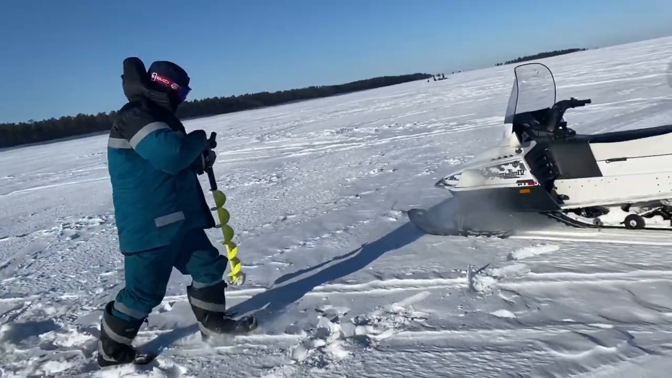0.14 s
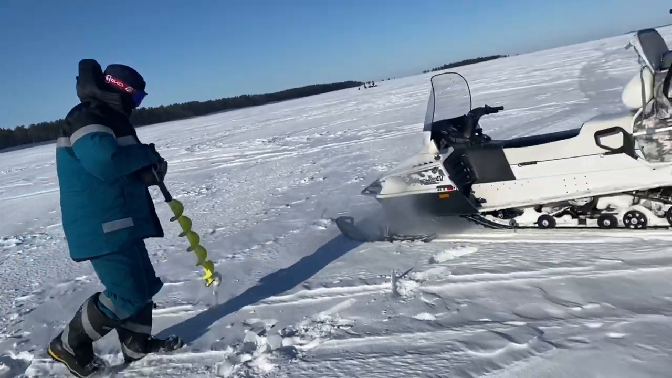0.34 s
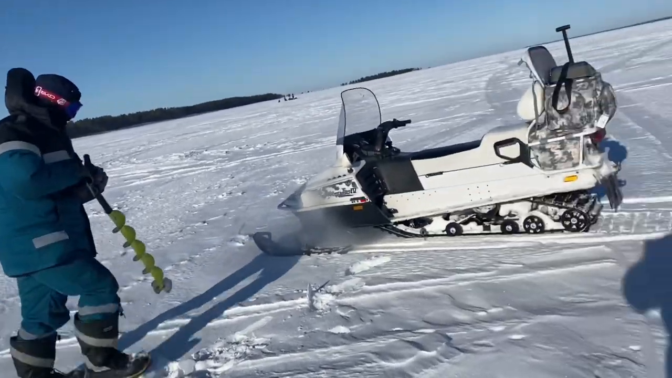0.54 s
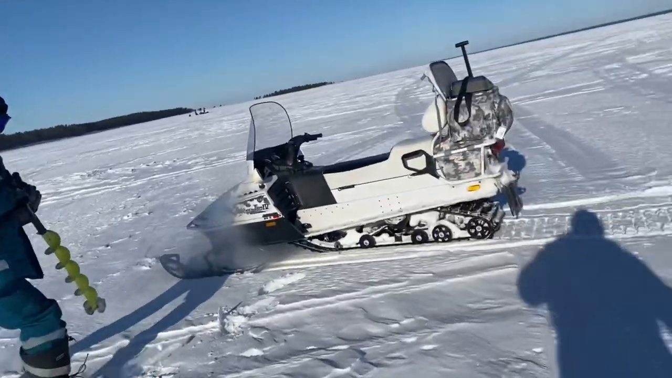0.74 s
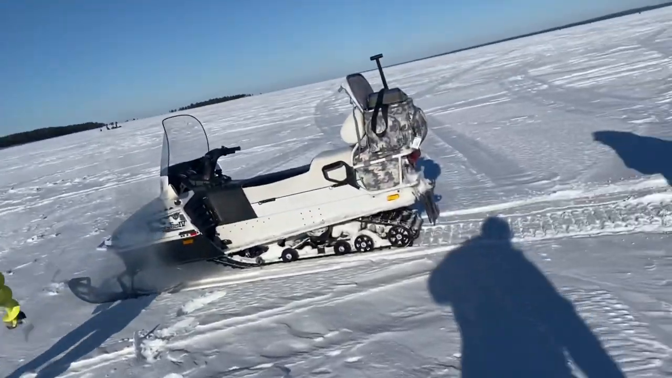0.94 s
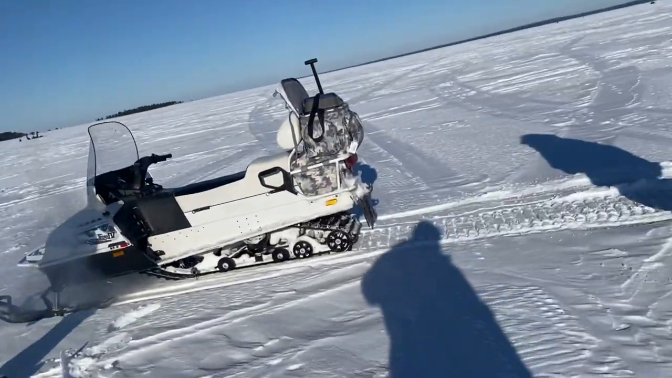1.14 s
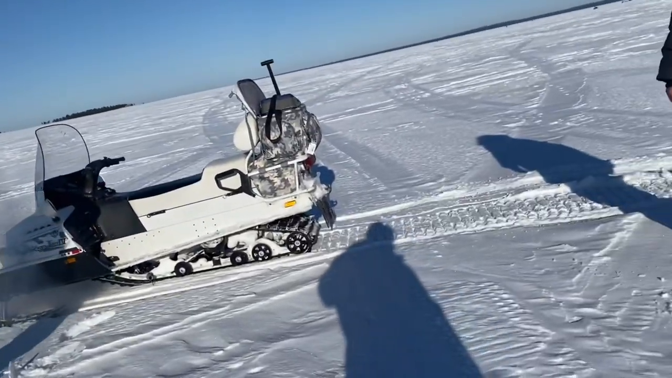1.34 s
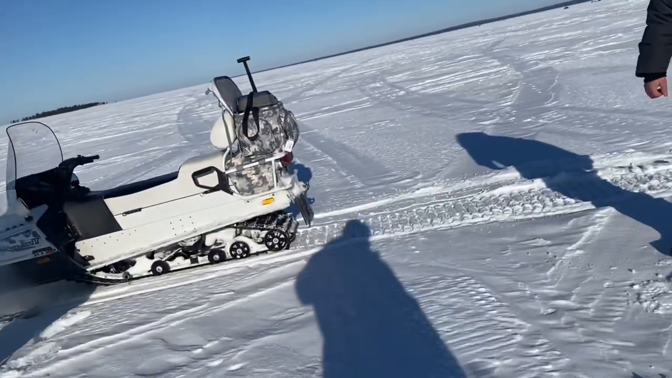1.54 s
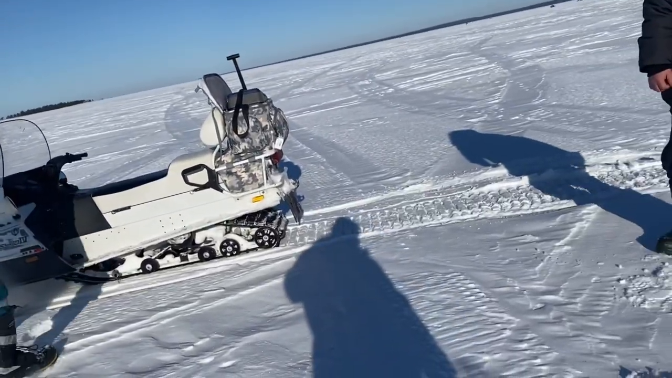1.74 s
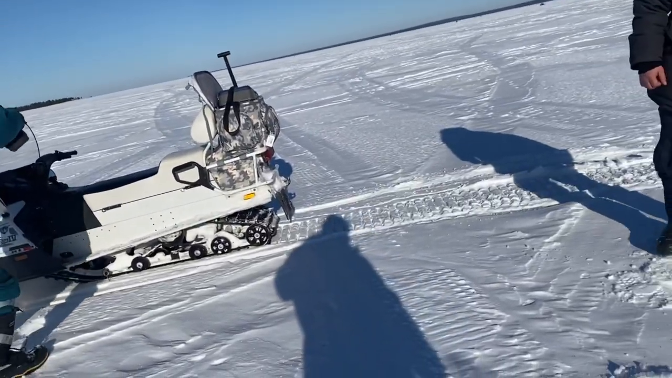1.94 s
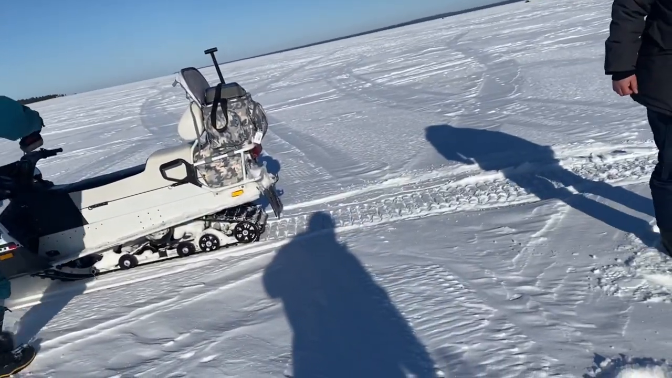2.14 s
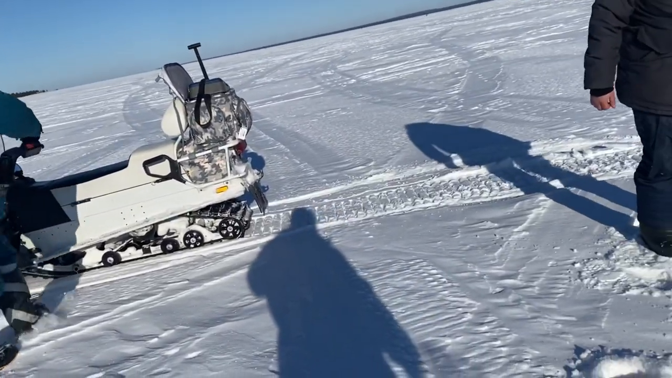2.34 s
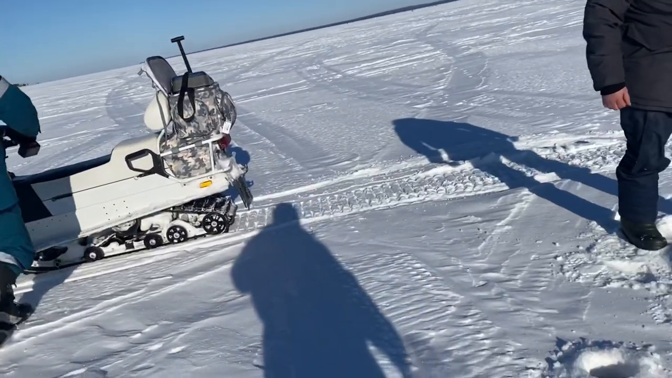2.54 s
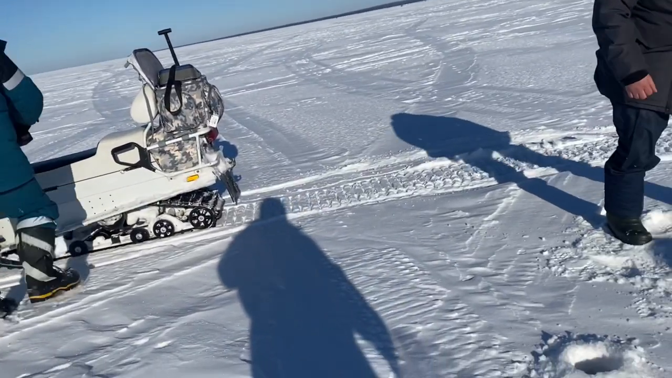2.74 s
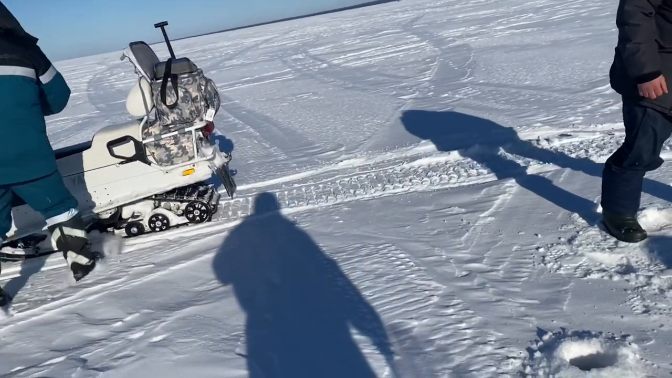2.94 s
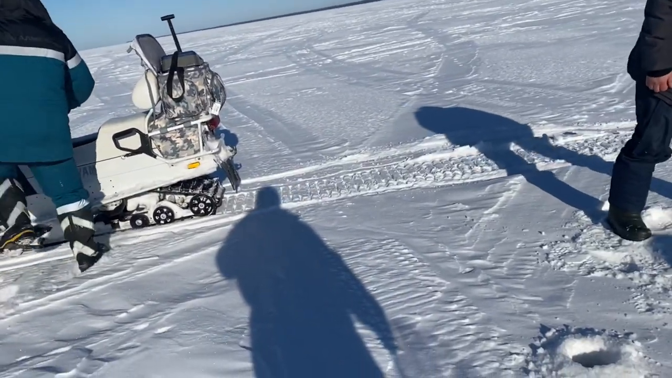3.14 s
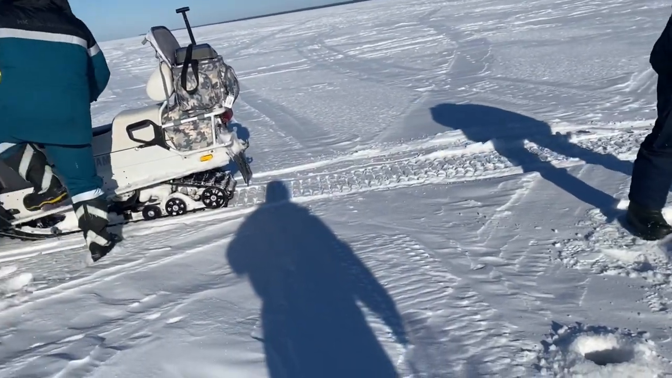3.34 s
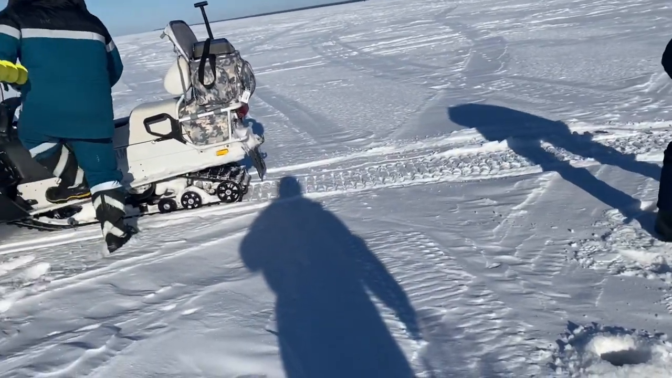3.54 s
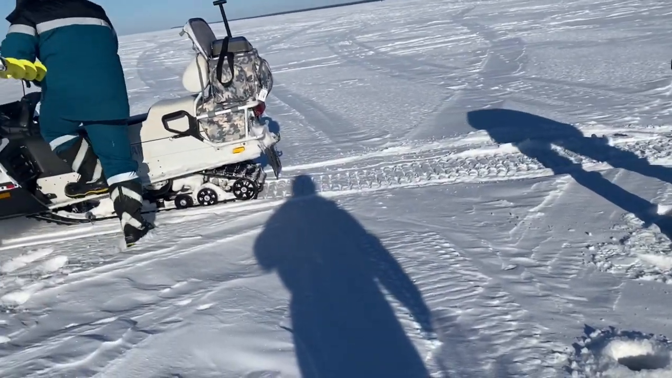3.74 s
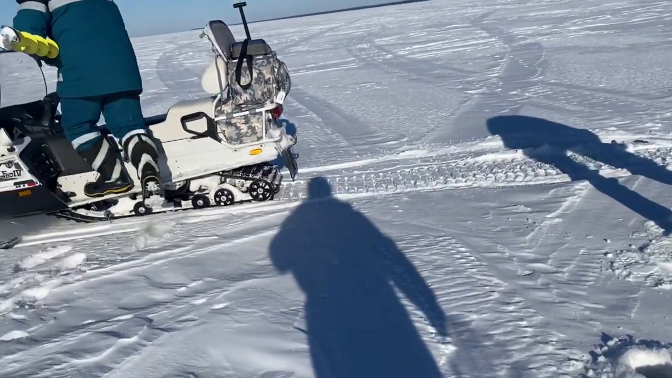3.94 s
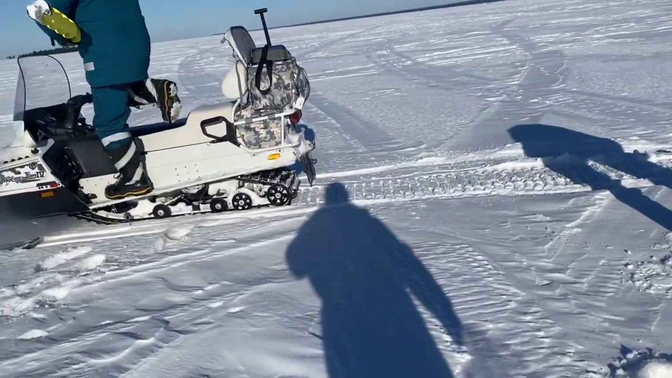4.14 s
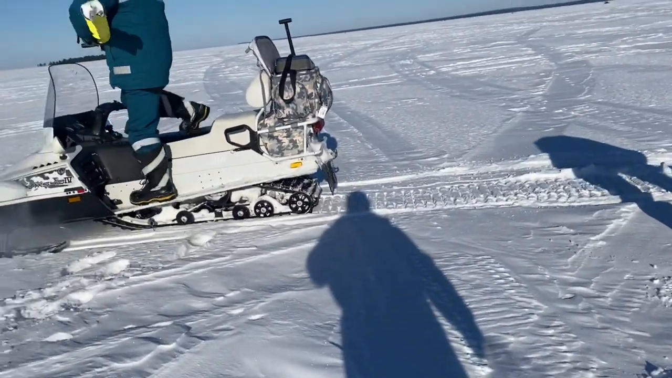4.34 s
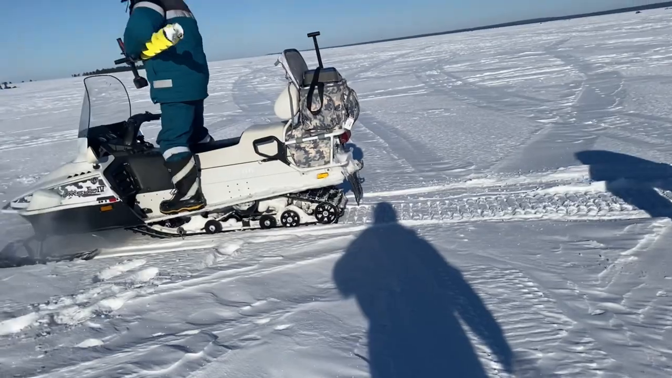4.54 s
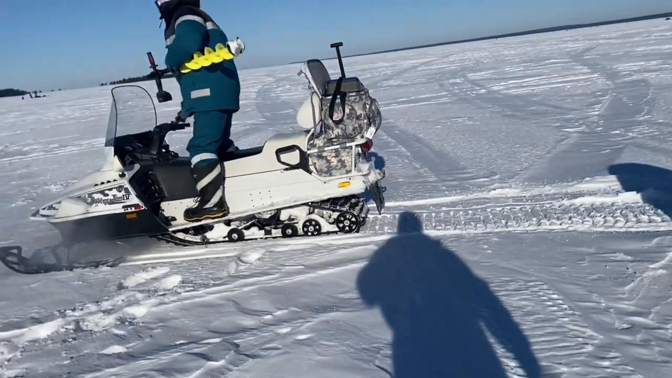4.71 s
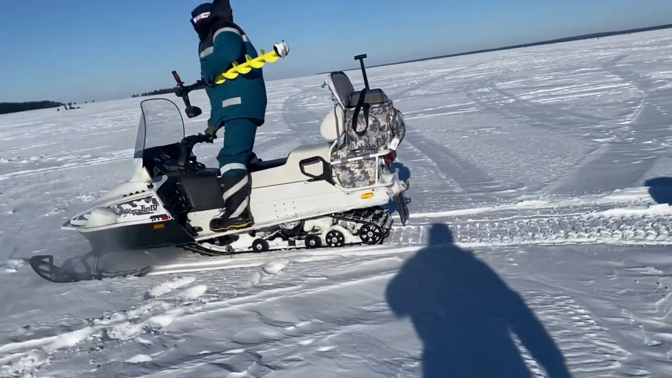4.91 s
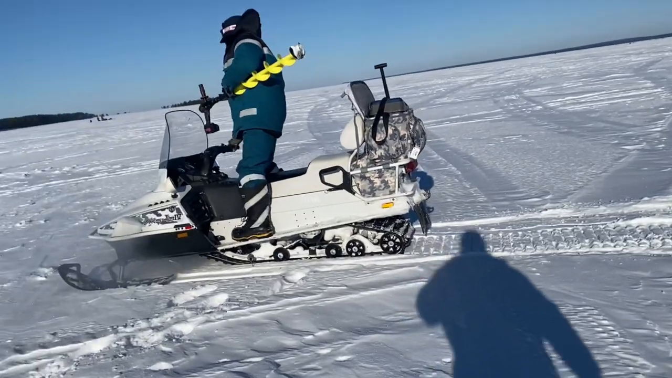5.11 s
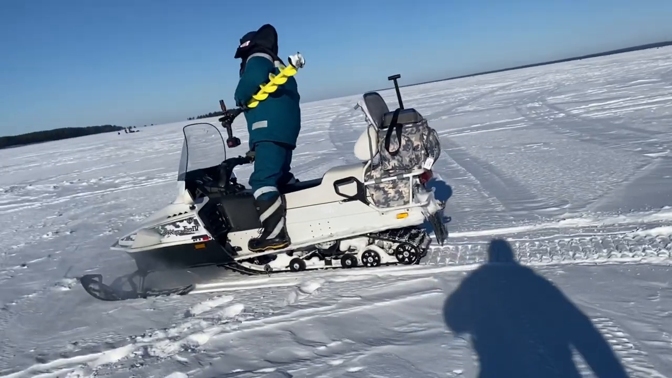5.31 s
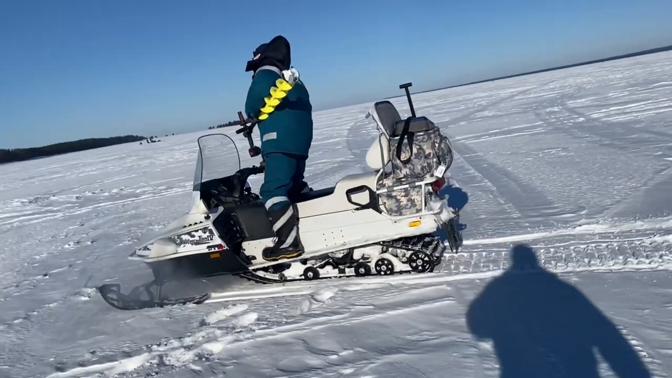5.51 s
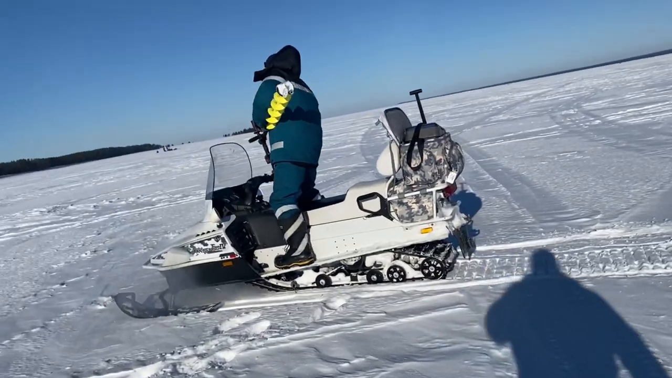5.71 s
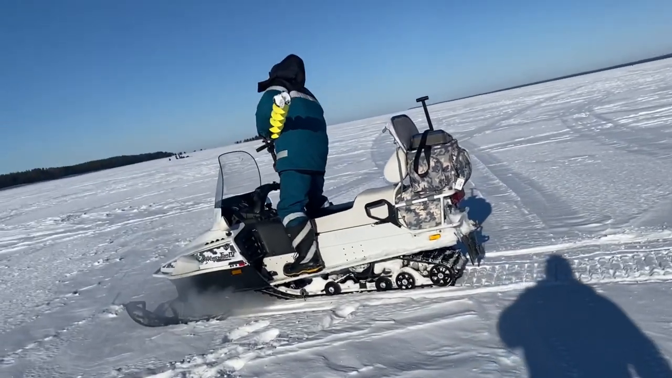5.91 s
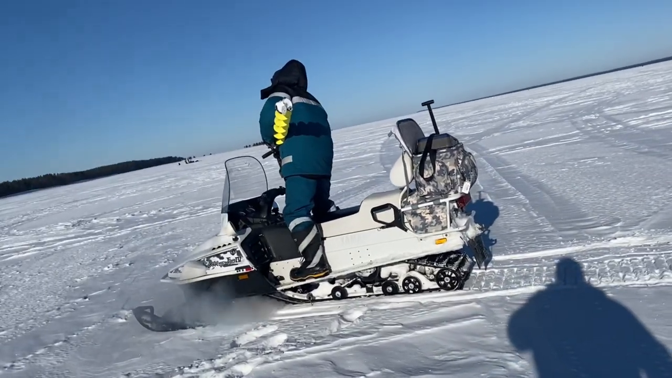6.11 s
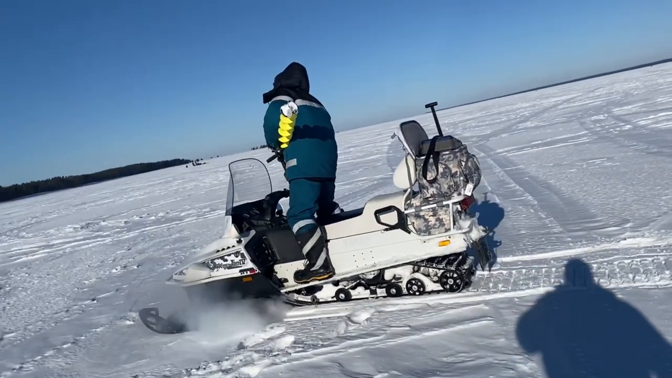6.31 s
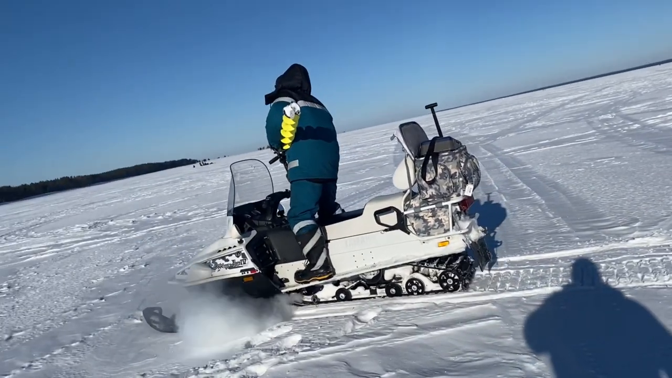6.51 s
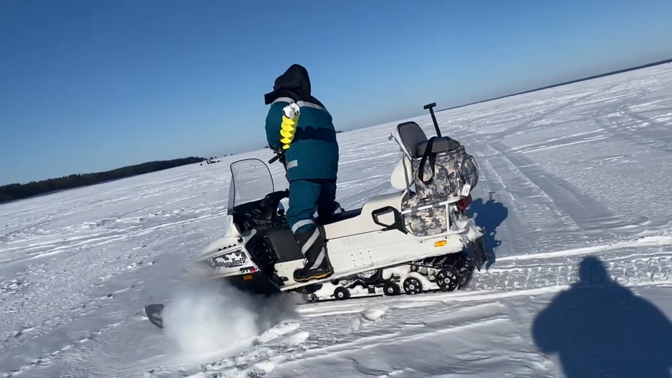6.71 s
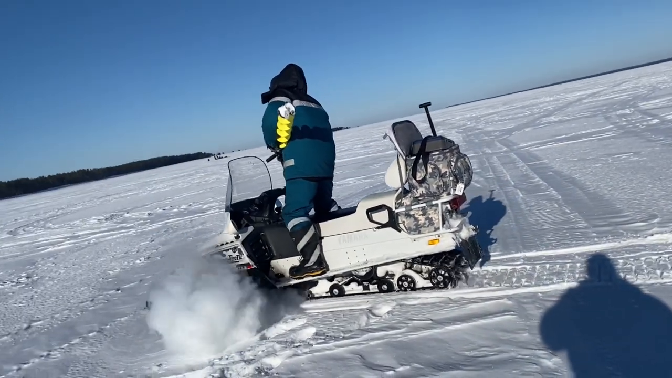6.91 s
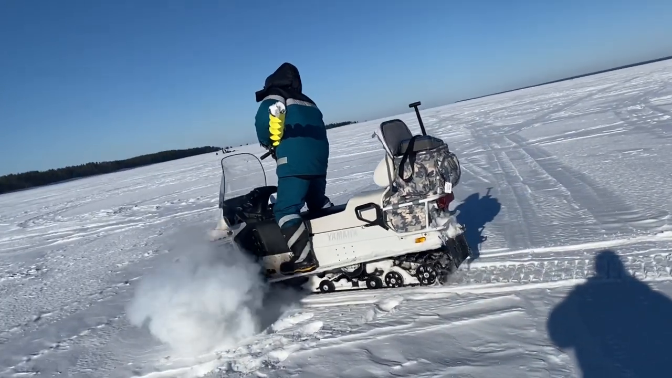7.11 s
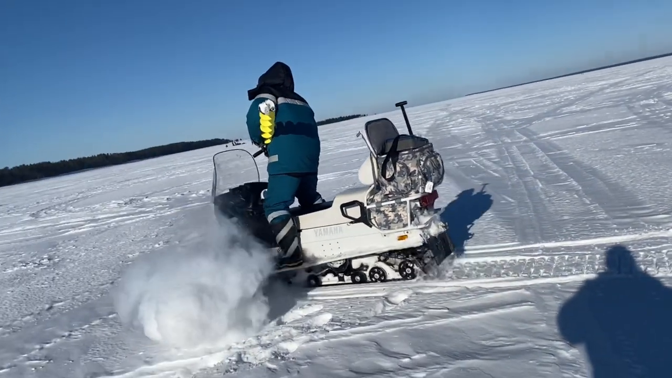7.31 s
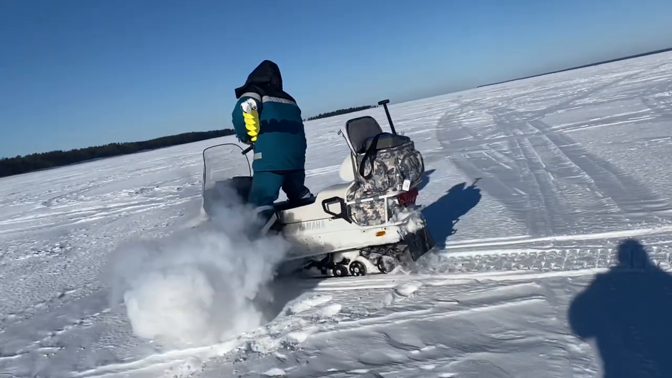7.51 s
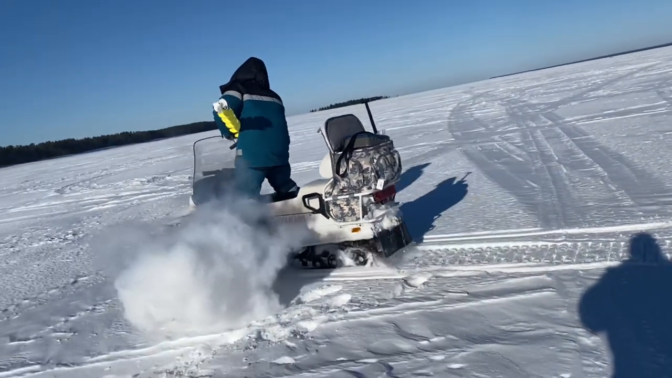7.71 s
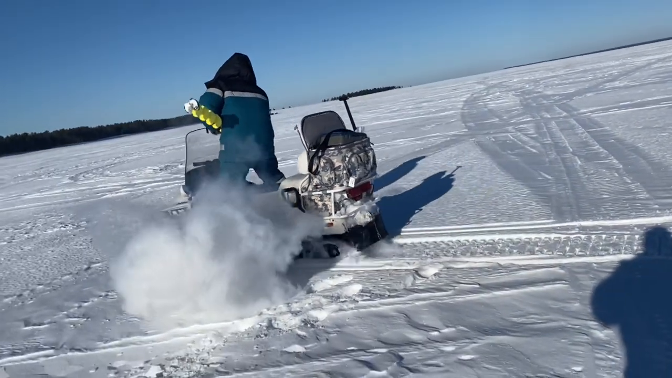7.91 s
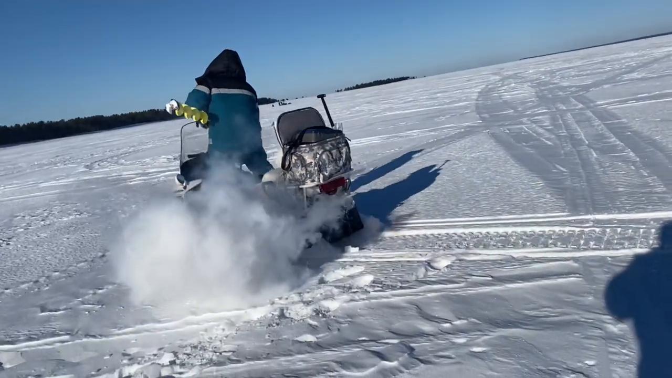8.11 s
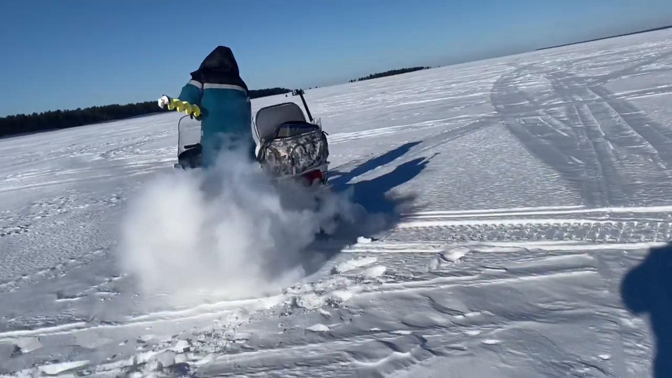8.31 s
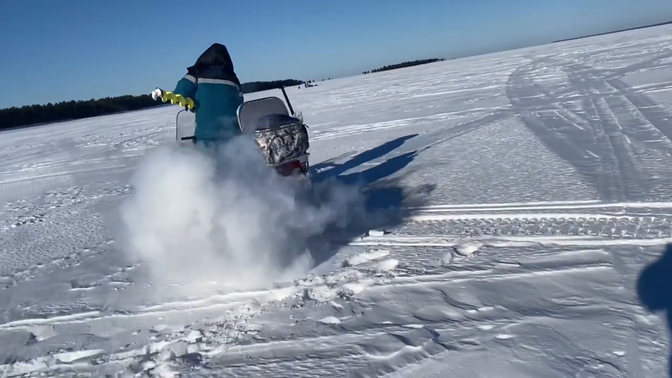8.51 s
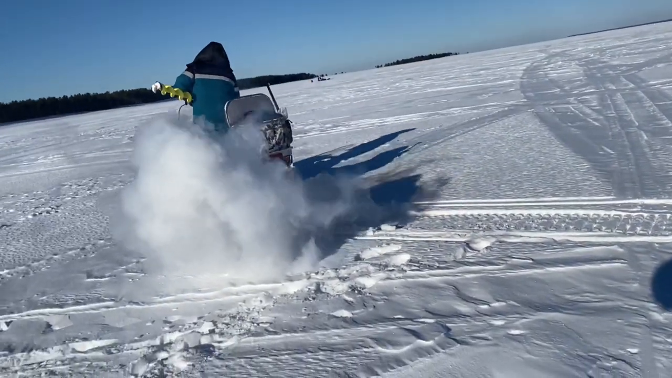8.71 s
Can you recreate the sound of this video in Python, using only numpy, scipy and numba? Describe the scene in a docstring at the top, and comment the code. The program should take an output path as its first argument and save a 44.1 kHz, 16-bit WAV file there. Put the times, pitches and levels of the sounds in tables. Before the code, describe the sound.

A two-stroke snowmobile idles a few metres away on open snow, with no echo. Its exhaust gives low, uneven pops, about six a second, over a light mechanical rattle, with small metallic clutch clacks during the first two seconds. Boots scuff softly through the snow, crunching lightly around 0.5 seconds. The engine's clatter dips briefly near 2.7 seconds while the popping continues. From 3.5 to 4.5 seconds comes a cluster of short, creaky snow crunches, ending in a dull knock on the running board. At about 5.2 seconds the throttle opens and the engine quickly climbs to a louder, stuttering drone, full of exhaust thumps, rattle, rasp and hiss. It sags for a moment near 5.7 seconds, then pulls on, creeping up in pitch. From about 7 seconds it softens gradually as the machine draws away, still running at the end, near 8.7 seconds.

```python
"""A two-stroke, two-cylinder snowmobile idles on a snowy lake a few metres away, then drives off.
At idle it fires only every second or third turn, and each firing pops out of the exhaust pipe.
The rider's boots crunch through the snow and knock on the running board. The throttle opens and the
machine stutters away: the pipe thumps and drones while the engine rattles, rasps and hisses."""
import sys
import numpy as np
from scipy import signal
from scipy.fft import rfft, irfft, next_fast_len
from scipy.io import wavfile
from scipy.ndimage import uniform_filter1d
from numba import njit

SR = 44100
rng = np.random.default_rng(int(sys.argv[2]) if len(sys.argv) > 2 else 0)


def generate_wav(signal):
    """Clip the signal to [-1, 1] and save it as 16-bit WAV at the path in sys.argv[1]."""
    frames = np.transpose(np.atleast_2d(signal))
    scaled = np.clip(frames, -1, 1) * 32767
    pcm = np.round(scaled).astype(np.int16)
    wavfile.write(sys.argv[1], SR, pcm)


N = 385875
TIME = np.arange(N) / SR

# Firings at idle: time_s, thump_db, crack_db
IDLE_POPS = [(0.112, -10, -46), (0.32, -10.5, -47), (0.478, -10, -42), (0.636, -9.5, -45),
             (0.799, -10, -43.5), (0.952, -9.5, -44.5), (1.061, -10.5, -45), (1.226, -11, -48),
             (1.311, -28, -65), (1.395, -12.5, -44), (1.549, -11, -40.5), (1.705, -11.5, -43),
             (1.86, -11, -43), (2.021, -11, -42.5), (2.226, -11.5, -40.5), (2.377, -10.5, -46),
             (2.481, -11.5, -60.5), (2.591, -12, -47.5), (2.706, -11, -52), (2.875, -12, -50),
             (3.037, -10.5, -46.5), (3.19, -13.5, -54), (3.242, -12, -47), (3.404, -10, -43.5),
             (3.561, -9, -44), (3.719, -9.5, -42.5), (3.875, -9.5, -44), (4.032, -9.5, -42),
             (4.187, -9.5, -41), (4.343, -9, -39.5), (4.501, -10.5, -43), (4.656, -10, -45),
             (4.766, -11, -42.5), (4.875, -12.5, -48), (4.987, -10.5, -46), (5.205, -10, -42)]
# Firings under load: time_s, thump_db, extra_rattle_db, extra_crack_db
LOAD_BARKS = [(5.2673, -14.5, -4, -6), (5.305, -12.5, -16, -5.5), (5.344, -8, -13, -0.5),
              (5.369, -20, 2, -4), (5.3932, -10, -5, -4), (5.4204, -10, -6, -6), (5.448, -6, -6, -5),
              (5.474, -21.0, -20, -5), (5.4963, -21, -23, -3.5), (5.5191, -15.5, -11.5, 0),
              (5.55, -23, -6, -2), (5.5937, -28, -15, 5), (5.6598, -18, -4, 5.5), (5.7301, -11, 1.5, 3),
              (5.801, -11, 3, 5), (5.8671, -13, -3, -6), (5.912, -19.5, -6, 3), (5.9334, -22, -9, 2),
              (5.9738, -23, -4, -4), (6.016, -16, -3, -2), (6.0357, -20, -1, 0.0), (6.0755, -17, -2, 3),
              (6.1141, -13, -5, -1), (6.1534, -12, -2, -4), (6.192, -24, 2, 2), (6.2494, -14.5, -1.5, 3),
              (6.269, -38, -5, -5), (6.3065, -16.0, -3, -5), (6.3447, -14, 0.0, 4), (6.403, -15, 1, -2),
              (6.4412, -21, 2, -0.5), (6.4803, -6.5, -1, 0), (6.5211, -23, 1, -4), (6.5585, -12, 2, -2),
              (6.6196, -14, 2.5, -4), (6.6611, -13, 4, 0.0), (6.7183, -16, -2, -2), (6.7589, -10, 2, 1.5),
              (6.8167, -11, 0.5, -2.0), (6.8752, -13, -0.5, 2.5), (6.9349, -18, -4.5, -3),
              (6.973, -10.5, 2, -5), (7.028, -10.5, 1.0, 1.0), (7.0848, -17, -3, 3), (7.119, -28, -4, -4),
              (7.1563, -13, 1.0, -4), (7.196, -23, -3, 3.0), (7.232, -22, -3.5, -5), (7.2664, -11, 0, 0.5),
              (7.3028, -21, -1.5, -4), (7.3594, -13, 3, 1.5), (7.3957, -16, -1, -3),
              (7.433, -12.5, 0.5, 2.5), (7.4973, -25, -5, -1), (7.5257, -11, 0, -2), (7.553, -15, -0.5, 3),
              (7.5987, -20, 2.0, 2.5), (7.6519, -16, 1, 0.5), (7.6897, -20, -4, -1.0),
              (7.725, -14, -2.0, 1), (7.771, -10.5, -2.5, 2), (7.827, -15, -2, 1), (7.8681, -24, 1.5, 3),
              (7.929, -18, 0, 4), (7.982, -20, 0, 3), (8.038, -21.0, -2, 3), (8.078, -14, -4, 4),
              (8.1134, -15, -11, 1), (8.1656, -16, -2, 1), (8.2338, -14, -11, 2), (8.269, -20, -17, 1.5),
              (8.315, -16, -1.5, 1), (8.3527, -16.0, -2, 2), (8.3894, -21.0, -1, -0.5),
              (8.4325, -24, 1.5, 0.0), (8.4587, -21.0, -2, -3), (8.4902, -21, -2, 0.5),
              (8.5409, -22, 0.0, 2.0), (8.576, -11, 3, 1), (8.6124, -14, 3, 1), (8.6495, -16, 3, -3),
              (8.692, -17, 4, -2.0), (8.738, -12, 3.5, -3)]
# How fast the crankshaft spins under load: time_s, turns_per_s
LOAD_SPEED = [(5.55, 45.5), (5.78, 43.3), (6.07, 51.4), (6.3, 52.7), (6.62, 49.8), (7.15, 54.6),
              (7.52, 54.4), (8.16, 58.4), (8.7, 58.4)]

# Tone shapes, which set the colour of a sound but not its loudness: pitch_hz, level_db
POP_TONE = [(25, -66.5), (50, -5), (80, 3.5), (108, 6), (135, -1), (175, -14), (230, -12), (290, -15),
            (320, -45), (365, -11), (410, -15.5), (450, -39.5), (800, -51.5), (1500, -54)]  # one firing in the muffler
PUMPING_TONE = [(25, -45), (45, -12.5), (70, 3), (112, 0), (150, -18.5), (220, -16), (300, -40), (380, -46),
                (600, -12.5), (1200, -83.5)]  # air pushed through without firing
IDLE_CLATTER_TONE = [(150, 1.5), (330, 9), (500, 5.5), (640, 3.5), (790, 5.5), (1000, -0.5), (1230, 5),
                     (1500, 3), (1800, -9.5), (2300, -23.5)]  # moving parts at idle
LOAD_CLATTER_TONE = [(180, -2.5), (340, 15), (490, 7), (590, 15.5), (700, 7.5), (850, 8.5), (1020, 8.5),
                     (1330, 12), (1700, 5.5), (2100, 3.5), (2500, -27.5)]  # moving parts under load
RASP_TONE = [(1500, -20), (2100, 3), (2330, -1.5), (2650, 3), (3200, -2), (4000, -7), (5000, -20),
             (6500, -33)]  # the engine's harsh upper middle
HISS_TONE = [(2500, -26), (4500, 6.5), (5700, 0.5), (7000, 13), (8500, 7), (11000, 3), (16000, 2)]  # the engine's treble
CRACK_TONE = [(600, 17), (1400, 2.2), (2200, 6.2), (3500, 11.7), (5500, 12.2), (7200, 12.6), (9000, 16.6),
              (11000, 13.6), (13000, 6.9), (15500, 7.6)]  # the sharp edge of a firing
GUSH_TONE = [(22, -40), (36, -22), (50, -7), (65, 5), (85, 9.5), (110, 6), (150, 1.5), (180, -0.5),
             (250, -0.5), (300, -12.5), (400, -5), (480, -15.5), (620, -43), (900, -37.5)]  # gas rushing through the pipe
SPRAY_TONE = [(2800, -30), (3900, -7), (5000, 6), (6000, -8), (7000, -56)]  # a narrow band of hiss

# How each engine noise changes in level: idle_db, load_db, rise_s, loss_behind_rider_db, loss_far_db
CLATTER_LEVELS = (-41, -29.5, 0.4, 6, 5)
RASP_LEVELS = (-52, -32, 0.3, 2, 8)
HISS_LEVELS = (-48, -33, 0.87, 5, 6.5)
CRACK_LEVELS = (-38, -35, 1.5, 2, 0)

# Notes that struck parts ring at (ring_s is the time to fade by 60 dB): pitch_hz, level_db, ring_s
CASING_NOTES = [(632, 4, 0.1), (770, 8, 0.032), (840, -35.5, 0.028), (1247, 7, 0.018), (1290, -4, 0.049),
                (1430, 11, 0.029), (1480, -21.5, 0.023), (1950, -39, 0.019), (2455, -5, 0.036),
                (2856, 4.5, 0.07)]  # engine casing and cover
CLUTCH_NOTES = [(840, -8, 0.034), (1244, 2, 0.041), (1405, -7, 0.035), (2870, -20.5, 0.031)]
# Clutch clacks at idle: start_s, strength_db
CLUTCH_CLACKS = [(0.2467, -22), (0.304, -24.5), (0.406, -30), (0.62, -26), (0.7824, -22), (0.852, -25.5),
                 (0.936, -26), (1.3739, -28), (1.4552, -36), (1.7634, -25), (1.846, -31), (2.211, -24)]

# Boots dragging through snow: middle_s, half_length_s, level_db, pitch_hz
BOOT_SCUFFS = [(0.257, 0.087, -53, 1990), (0.542, 0.27, -46, 2190), (2.325, 0.0235, -46, 12000),
               (2.836, 0.035, -46.5, 8900), (1.268, 0.34, -53.5, 5000), (1.778, 0.21, -50, 5500),
               (2.26, 0.3, -48.5, 5230), (3.678, 0.37, -49.5, 4660), (4.31, 0.23, -49.5, 5500),
               (4.745, 0.21, -54.5, 6000)]
# Boots pressing on snow: start_s, creak_db, pitch_hz, snap_db
BOOT_CRUNCHES = [(.43, -30, 1695, -47), (.565, -31, 1800, -35), (2.861, -36, 900, -35),
                 (3.508, -19.5, 457, -30), (3.543, -23.5, 613, -30), (3.632, -22.5, 630, -37.5),
                 (3.666, -27, 700, -28.5), (3.703, -17.5, 676, -29), (3.743, -22, 740, -35),
                 (3.77, -21, 596, -31), (3.848, -23, 670, -32), (3.974, -45, 900, -36),
                 (4.277, -23, 580, -31), (4.32, -26, 720, -28), (4.534, -26.5, 567, -33.5)]
# A boot landing on the running board: start_s, level_db, pitch_hz, ring_s
BOARD_KNOCK = (4.52, -17, 280, .07)

# Drone notes that swell near a pipe resonance:
# cycles_per_turn, off_resonance_db, on_resonance_db, resonance_hz, half_width_hz
DRONE_NOTES = [(2, -23, -17.3, 99, 18), (4, -35, -24, 208, 16), (6, -31, -28, 351, 8),
               (8, -42, -31, 415, 22)]
# Weaker drone notes; odd ones come from the cylinders firing unequally: cycles_per_turn, level_db
DRONE_OVERTONES = [(1, -24), (3, -35), (5, -32), (7, -36), (9, -39), (10, -39), (11, -33), (12, -37),
                   (13, -41), (14, -41), (15, -37), (16, -37), (17, -41), (26, -43), (27, -42)]
# Rings that each firing under load sets off in the engine casing and the pipe: pitch_hz, level_db, ring_s,
# ahead_of_thump_s, strongest_at_s, half_length_s
FIRING_RINGS = [(368, -11, 0.039, .013, 5.36, 0.18), (1410, -17.5, .025, 0.015, 5.3, 0.91),
                (1995, -23, 0.029, 0.02, 5.48, 0.38), (1560, -13.5, 0.007, .0215, 6.3, 0.86),
                (220, -17.5, 0.021, 0.01207, 6.24, 0.52), (812, -18, 0.045, .016, 7.82, 1.01),
                (1390, -18, 0.013, 0.0096, 7.94, 0.34), (157, -19, 0.085, 0.0123, 8.7, 1.7)]

# How the two microphones differ: pitch_hz, left_louder_db, left_ahead_radians
IDLE_STEREO = [(60, 1.7, .05), (300, 1.5, .1), (450, 2, .3), (600, 5, .9), (750, 4, .8), (1000, 9, .9),
               (1350, 4, .6), (1700, -1, 1.2), (2100, 1, 1.6), (2800, 8, .3), (3300, 5, .2), (4000, 1, 0),
               (5700, 2.4, 0), (7500, 0, 0)]
LOAD_STEREO = [(60, 1.6, .05), (300, 1.4, .08), (450, 1.2, .08), (700, 3.2, .08), (1150, 4.2, .08),
               (1600, 1, .15), (2100, -.5, .8), (2650, 3.3, 1.2), (3500, 2.5, .8), (4300, 4, .8),
               (5000, 7, .8), (6000, 5, .8), (6600, 1, 0), (7500, 0, 0)]
# Extra shift between them in the treble: pitch_hz, left_ahead_radians
TREBLE_STEREO = [(7400, 0), (8700, -3.1), (9400, -3.2), (10600, -6.25), (11600, -6.3), (12800, -9.4),
                 (13600, -9.5), (14900, -12.55)]

IDLE_TURNS_PER_S, IDLE_THROTTLE = 19, 0.2  # full throttle is 1
POP_LEAD_S, BARK_LEAD_S = .003, .02  # the fuel burns this long before the listed time
OPEN_S, OPEN_TAKES_S, RUN_UP_S = 5.19, 0.32, .295  # the throttle opens and the engine speeds up
SHADE_S, SHADE_WIDTH_S = 2.66, 0.98  # the rider passes in front of the engine
CLUTCH_S, CLUTCH_WIDTH_S, CLUTCH_SAG = 5.74, 0.17, 0.28  # the clutch bites and takes a share of effort
PULL_S, PULL_WIDTH_S, PULL_DB = 6.3, .5, 1.5  # extra rasp as the track starts to pull
LEAVE_S, LEAVE_TAKES_S = 6.76, 1.98  # the machine draws away
TURN_S, TURN_TAKES_S, TURN_LOSS_DB = 6.895, 0.42, 8  # its exhaust outlet swings away


def from_db(db):
    """Turn decibels into a number to multiply by."""
    return 10 ** (np.asarray(db) / 20)


def unit_power(x):
    """Scale a sound so its average power is 1."""
    return x / np.sqrt(np.mean(x ** 2) + 1e-20)


def ramp(start_s, takes_s):
    """Rise evenly from 0 to 1 and stay there."""
    return np.clip((TIME - start_s) / takes_s, 0, 1)


def swell(at_s, width_s):
    """Rise smoothly to 1 and fall back."""
    return np.exp(-((TIME - at_s) / width_s) ** 2)


def at_hz(points, hz):
    """Read a curve between its listed pitches, with octaves evenly spaced."""
    points = np.array(points)
    return np.interp(np.log(hz + 1), np.log(points[:, 0]), points[:, 1])


def filtered(x, order, hz, kind="low"):
    """Keep the lows or one band; a higher order cuts more steeply."""
    return signal.sosfilt(signal.butter(order, hz, kind, fs=SR, output="sos"), x)


def through(x, tone, size=8192):
    """Pass a sound through a body that colours it with the given tone shape."""
    gains = from_db(at_hz(tone, np.fft.rfftfreq(size, 1 / SR)))
    cepstrum = irfft(np.log(gains))
    cepstrum[1:size // 2] *= 2  # minimum phase: the body rings only after it is hit
    cepstrum[size // 2 + 1:] = 0
    response = irfft(np.exp(rfft(cepstrum)))
    response /= np.linalg.norm(response)
    return signal.oaconvolve(np.atleast_2d(x), response[None], axes=1)[:, :N]


def clicks(times, sizes):
    """Place a one-sample click at each time."""
    at = np.round(np.asarray(times) * SR).astype(int)
    inside = (at >= 0) & (at < N)
    return np.bincount(at[inside], (sizes * np.ones(len(at)))[inside], N)


def bursts(times, sizes, rise_s, fall_s):
    """A loudness curve that jumps up at each time and dies away."""
    t = TIME[:SR // 5]
    shape = (1 - np.exp(-t / rise_s)) * np.exp(-t / fall_s)
    return np.abs(signal.oaconvolve(clicks(times, sizes), shape / shape.max())[:N])


def noise(apart):
    """Stereo white noise; the larger apart is, the more left and right differ."""
    return unit_power(rng.standard_normal(N) + apart * rng.standard_normal((2, N)))


def ring(times, sizes, notes):
    """Each knock rings all the notes of a part, each with a slightly random strength."""
    out = np.zeros(N)
    for hz, db, ring_s in notes:
        decay, angle = from_db(-60 / (ring_s * SR)), 2 * np.pi * hz / SR
        knocks = clicks(times, sizes * from_db(db + rng.normal(0, 1.9, len(times))))
        feedback = [1, -2 * decay * np.cos(angle), decay * decay]
        out += signal.lfilter([0, np.sin(angle)], feedback, knocks + 1e-18)
    return out


def level_db(levels):
    """An engine noise grows with effort, dips behind the rider and fades with distance."""
    idle_db, load_db, rise_s, shade_db, far_db = levels
    effort = ramp(OPEN_S, rise_s) - CLUTCH_SAG * swell(CLUTCH_S, CLUTCH_WIDTH_S)
    loss_db = shade_db * swell(SHADE_S, SHADE_WIDTH_S) + far_db * ramp(LEAVE_S, LEAVE_TAKES_S) ** 2
    return idle_db + (load_db - idle_db) * effort - loss_db


def crankshaft(in_step_until_s=7.7):
    """Count half turns, one per piston stroke, nudged into step with the firings."""
    load_speed = np.interp(TIME, *np.transpose(LOAD_SPEED))
    speed = IDLE_TURNS_PER_S + (load_speed - IDLE_TURNS_PER_S) * ramp(OPEN_S, RUN_UP_S)
    count = 2 * np.cumsum(speed) / SR
    barks = [s for s, *_ in LOAD_BARKS if s < in_step_until_s]
    fired = np.r_[np.array(IDLE_POPS)[:, 0] - POP_LEAD_S, barks]
    at_firing = np.interp(fired, TIME, count)
    whole = np.r_[0, np.cumsum(np.maximum(np.round(np.diff(at_firing)), 1))]
    return count + uniform_filter1d(np.interp(TIME, fired, whole - at_firing), size=3000)


def firings():
    """Every time the fuel burns, as three lists: start_s, extra_rattle_db, crack_db."""
    idle = [(s - POP_LEAD_S, 0, db) for s, _, db in IDLE_POPS]
    s, _, rattle_db, extra_db = np.transpose(LOAD_BARKS)
    crack_db = extra_db + np.interp(s, TIME, level_db(CRACK_LEVELS))
    return np.vstack([idle, np.c_[s - BARK_LEAD_S, rattle_db, crack_db]]).T


@njit
def pipe_note(x, hz, width_hz):
    """The air in the pipe rings at a pitch that can move."""
    out = np.zeros(len(x))
    decay = np.exp(-np.pi * width_hz / SR)
    for i in range(2, len(x)):
        push = (1 - decay ** 2) / 2 * (x[i] - x[i - 2])
        pull = 2 * decay * np.cos(2 * np.pi * hz[i] / SR)
        out[i] = push + pull * out[i - 1] - decay ** 2 * out[i - 2]
    return out


def muffler_chamber(x, hz, width_hz):
    """A chamber delays the notes near its own pitch without changing their level."""
    decay = np.exp(-np.pi * width_hz / SR)
    feedback = np.array([1, -2 * decay * np.cos(2 * np.pi * hz / SR), decay * decay])
    return signal.lfilter(feedback[::-1], feedback, x)


def idle_exhaust(strokes, throttle, misfire_s=1.318, misfire_db=11):
    """Strokes puff air unevenly through the muffler; a firing adds a pop that falls in pitch."""
    s, thump_db, _ = np.transpose(IDLE_POPS)
    fired = s - POP_LEAD_S
    # Hot gas lifts the pipe's note, which sags until the next firing.
    heat = np.minimum(bursts(np.r_[fired, misfire_s - .015], 1, rise_s=.03, fall_s=.04), 1)
    puff_spread, waver = rng.standard_normal((len(strokes), 2)).T
    note_hz = 73 + 42 * heat + 9 * np.interp(TIME, strokes, waver)
    puffs = clicks(strokes + .002, from_db(1.8 * puff_spread)) + clicks([misfire_s], from_db(misfire_db))
    hum = through(pipe_note(puffs * (1 - throttle), note_hz, width_hz=67.0), PUMPING_TONE) * from_db(9.5)
    pops = -through(clicks(fired + 0.0015, from_db(thump_db + 28.5)) * (1 - throttle), POP_TONE)
    pops = muffler_chamber(pops, hz=142.1, width_hz=124)
    pops = muffler_chamber(pops, hz=261.7, width_hz=510)
    # Changing gas heat bends each pop's pitch.
    delay_s = np.interp(TIME, strokes, rng.normal(0, .0005, len(strokes)))
    return np.interp(TIME - delay_s, TIME, (hum + pops)[0])


def engine_rattle(strokes, slap_sizes, surge, throttle):
    """A loudness curve: pistons, clutch and intake shake on each stroke and surge after a firing."""
    slaps = bursts(strokes, slap_sizes, rise_s=0.00093, fall_s=0.0018)
    rattle = 1.23 + 0.16 * slaps + (1.17 + .5 * throttle) * surge
    return rattle / np.sqrt(uniform_filter1d(rattle ** 2, size=SR // 4))


def clatter(strokes, slap_sizes, rattle, throttle):
    """Moving parts clatter; opening the throttle changes their tone and brings in hard knocks."""
    db = level_db(CLATTER_LEVELS)
    knocks = clicks(strokes, from_db(11) * slap_sizes)
    idle = through(noise(apart=0.68) * rattle * (1 - throttle), IDLE_CLATTER_TONE)
    load = through((noise(apart=0.052) * rattle + knocks) * throttle, LOAD_CLATTER_TONE)
    return idle * from_db(db + 7.5) + load * from_db(db + 4.5)


def casing_clanks(strokes, slap_sizes, rattle, throttle):
    """Each piston stroke knocks the casing and cover into ringing."""
    times = strokes + rng.normal(0, 0.00042, len(strokes))
    clanks = ring(times, slap_sizes * np.interp(strokes, TIME, rattle), CASING_NOTES)
    return clanks * from_db(level_db(CLATTER_LEVELS) - 13 - 4.9 * throttle)


def engine_rasp(rattle, surge, throttle):
    """A harsh noise that jumps with each firing and is strongest as the track starts to pull."""
    rasp = through(noise(apart=0.51) * rattle * (1 + 0.26 * surge * throttle), RASP_TONE)
    return rasp * from_db(level_db(RASP_LEVELS) + PULL_DB * swell(PULL_S, PULL_WIDTH_S))


def engine_hiss(rattle, throttle):
    """A high hiss that flutters with the rattle and is duller at idle."""
    hiss = through(noise(apart=0.057) * rattle, HISS_TONE) * from_db(level_db(HISS_LEVELS) - 4.5)
    return throttle * hiss + (1 - throttle) * filtered(hiss, order=2, hz=9000)


def panel_echoes(x, echo_db=-23.5, count=14):
    """Quick echoes between the body panels colour the sound."""
    lags = (rng.uniform(.001, .016, count) * SR).astype(int)
    gains = from_db(echo_db) * rng.choice([-1, 1], count)
    out = x.copy()
    for lag, gain in zip(lags, gains):
        out[:, lag:] += gain * x[:, :-lag]
    return out / np.sqrt(1 + np.sum(gains ** 2))


def firing_cracks(fired, crack_db, throttle):
    """Burning fuel spits briefly at idle and blows for longer with a full charge."""
    opening = np.interp(fired, TIME, throttle)
    spit = bursts(fired - .001, from_db(crack_db + 4.5) * (1 - opening), rise_s=.012, fall_s=.009)
    blow = bursts(fired - .002, from_db(crack_db) * opening, rise_s=0.014, fall_s=0.011)
    return through(noise(apart=0.02) * (uniform_filter1d(spit, size=440) + blow), CRACK_TONE)


def clutch_clacks():
    """The idling clutch takes up its slack with a metallic clack."""
    s, db = np.transpose(CLUTCH_CLACKS)
    return ring(s, from_db(db - 5), CLUTCH_NOTES)


def boot_scuffs():
    """A dragged boot breaks many fine snow grains in one soft swell."""
    out = np.zeros(N)
    for s, width_s, db, hz in BOOT_SCUFFS:
        grains = rng.standard_normal(N) * from_db(1.1 * np.minimum(rng.exponential(1, N), 4))
        scuff = filtered(grains, order=1, hz=[hz * 0.63, hz * 1.12], kind="band")
        out += unit_power(scuff) * swell(s, width_s) * from_db(db)
    return out


def boot_crunches():
    """Cold snow gives way under a boot in a short, grainy creak, and its crust snaps."""
    out = np.zeros(N)
    t = TIME[:SR // 10]
    for s, creak_db, hz, snap_db in BOOT_CRUNCHES:
        grains = rng.standard_normal(len(t)) * from_db(2.6 * rng.exponential(1, len(t)))
        grains *= np.exp(-t / 0.0084)
        creak = filtered(grains, order=1, hz=[hz * 0.87, hz * 1.12], kind="band")
        creak = filtered(creak, order=1, hz=3000)
        snap = filtered(grains, order=2, hz=[2500, 7000], kind="band")
        start = round(s * SR)
        for sound, db in ((creak, creak_db), (snap, snap_db)):
            out[start:start + len(t)] += from_db(db) * sound / np.abs(sound).max()
    return out


def board_knock():
    """The running board gives a dull knock under the rider's weight."""
    s, db, hz, ring_s = BOARD_KNOCK
    t = np.maximum(TIME - s, 0)
    return from_db(db - 60 * np.minimum(t / ring_s, 10)) * np.sin(2 * np.pi * hz * t)


def pipe_boom(half_turns, lowest_hz=39.7):
    """The pipe booms briefly on the crankshaft's lowest notes, just before the throttle opens."""
    angle = np.pi * (half_turns - .5)
    turn_hz = np.gradient(half_turns) * SR / 2
    escaping = 1 / np.sqrt(1 + (lowest_hz / turn_hz) ** 20)  # very deep notes barely leave the pipe
    notes = escaping * np.cos(angle) + np.cos(2 * angle)
    return notes * from_db(-21) * swell(at_s=4.9, width_s=0.065)


def loaded_exhaust(half_turns, throttle, thump_hz=88, thump_width_s=.0098):
    """Gas gushes through the pipe on every stroke; each firing under load adds one low thump."""
    s, db, _, _ = np.transpose(LOAD_BARKS)
    t = np.arange(-1000, 1001) / SR
    thump = -np.cos(2 * np.pi * thump_hz * t) * np.exp(-(t / thump_width_s) ** 2)
    thumps = signal.oaconvolve(clicks(s, from_db(db)), thump, "same")
    gush = unit_power(rng.standard_normal(N) * (1 + np.cos(2 * np.pi * half_turns))) * from_db(-22)
    return thumps + through(gush * throttle, GUSH_TONE)[0]


def pipe_drone(half_turns, throttle):
    """Notes at multiples of the crankshaft's speed; the main ones swell near the pipe's resonances."""
    turns = half_turns / 2
    speed = np.gradient(turns) * SR
    main = np.zeros(N)
    for cycles, off_db, on_db, hz, width_hz in DRONE_NOTES:
        nearness = 1 / (1 + ((cycles * speed - hz) / width_hz) ** 2)
        loss_db = TURN_LOSS_DB * ramp(TURN_S, TURN_TAKES_S) * (cycles == 2)
        db = off_db + (on_db - off_db) * nearness - loss_db
        # Pressure peaks a quarter turn after the exhaust port opens.
        main += from_db(db) * np.cos(2 * np.pi * cycles * (turns - 1 / 4))
    # No two turns are equally strong, which roughens the overtones.
    turn_sizes = from_db(rng.normal(0, 3, round(turns[-1]) + 1))
    uneven = unit_power(np.interp(turns, np.arange(len(turn_sizes)), turn_sizes))
    overtones = sum(from_db(db) * np.cos(2 * np.pi * (cycles * turns + rng.random()))
                    for cycles, db in DRONE_OVERTONES)
    fade = 1 - 0.47 * ramp(LEAVE_S, LEAVE_TAKES_S)
    return (main + overtones * uneven * fade) * throttle ** 2


def spray(rattle, throttle):
    """A spray-like hiss, wide in stereo, comes up with the throttle and fades as the machine leaves."""
    db = -47.5 - 4.5 * ramp(LEAVE_S, LEAVE_TAKES_S) ** 2
    return through(noise(apart=8.9) * rattle * throttle ** 2, SPRAY_TONE) * from_db(db)


def firing_rings(throttle):
    """Each firing under load rings the engine casing and the pipe; different notes stand out at different
    times."""
    s = np.array(LOAD_BARKS)[:, 0]
    out = np.zeros(N)
    for hz, db, ring_s, ahead_s, at_s, width_s in FIRING_RINGS:
        sizes = np.interp(s, TIME, throttle * swell(at_s, width_s))
        out += ring(s - ahead_s, sizes, [(hz, db, ring_s)])
    return out


def scene():
    """Add up the exhaust, the engine and the rider; open snow returns no echo."""
    throttle = IDLE_THROTTLE + (1 - IDLE_THROTTLE) * ramp(OPEN_S, OPEN_TAKES_S)
    half_turns = crankshaft()
    strokes = np.interp(np.arange(np.ceil(half_turns[0]), half_turns[-1]), half_turns, TIME)
    exhaust = idle_exhaust(strokes, throttle) + pipe_boom(half_turns)
    exhaust += loaded_exhaust(half_turns, throttle) + pipe_drone(half_turns, throttle)

    fired, rattle_db, crack_db = firings()
    slap_sizes = from_db(rng.normal(0, 2.5, len(strokes)))
    surge = bursts(fired - .002, 0.74 * from_db(rattle_db), rise_s=0.0083, fall_s=0.0096)
    rattle = engine_rattle(strokes, slap_sizes, surge, throttle)
    inside = clatter(strokes, slap_sizes, rattle, throttle)
    clanks = casing_clanks(strokes, slap_sizes, rattle, throttle)
    inside += engine_rasp(rattle, surge, throttle)
    wide_hiss = spray(rattle, throttle)
    inside += engine_hiss(rattle, throttle)
    cracks = firing_cracks(fired, crack_db, throttle)
    engine = panel_echoes(inside) + clanks + cracks + wide_hiss

    machine = exhaust + engine + firing_rings(throttle) + clutch_clacks()
    return machine + boot_crunches() + boot_scuffs() + board_knock()


def record(dry):
    """Two microphones differ in level and timing, which shift as the machine moves off."""
    size = next_fast_len(N + SR // 10)
    hz = np.fft.rfftfreq(size, 1 / SR)
    spectrum = rfft(dry, size) / np.sqrt(1 + (hz / 16000) ** 200)  # cut the highest treble
    heard = []
    for stereo in (np.array(IDLE_STEREO), np.array(LOAD_STEREO)):
        phase = at_hz(stereo[:, ::2], hz) + at_hz(TREBLE_STEREO, hz)
        left = from_db(at_hz(stereo[:, :2], hz) / 2) * np.exp(.5j * phase)
        heard.append(irfft(spectrum * np.array([left, 1 / left]), size)[:, :N])
    idling, driving = heard
    moving = ramp(OPEN_S, OPEN_TAKES_S)
    return idling * (1 - moving) + driving * moving


dry = scene()
out = record(dry)
generate_wav(out)
```